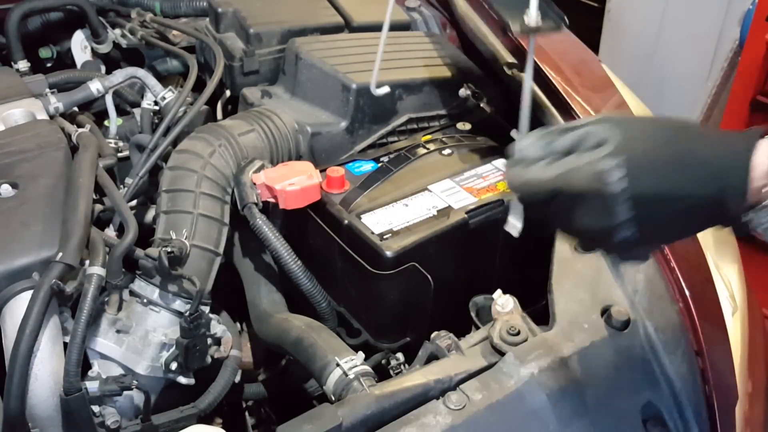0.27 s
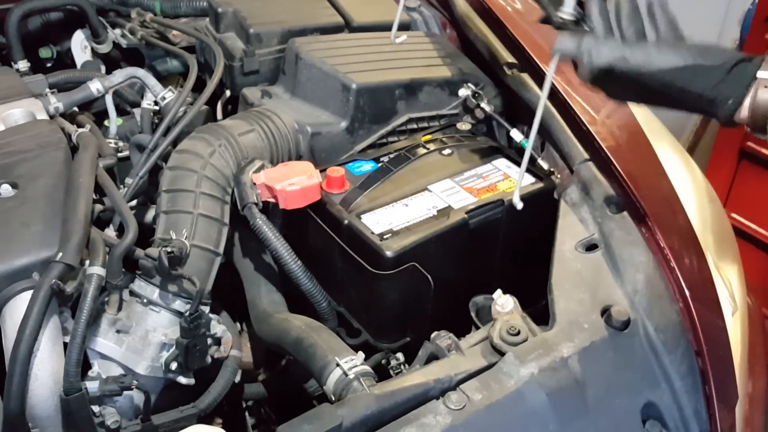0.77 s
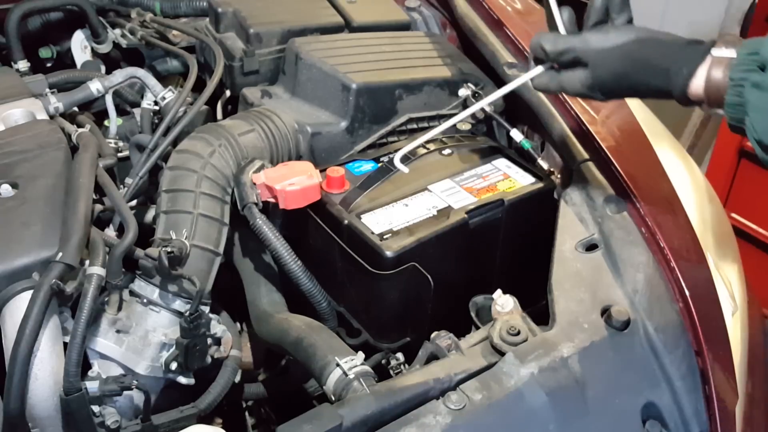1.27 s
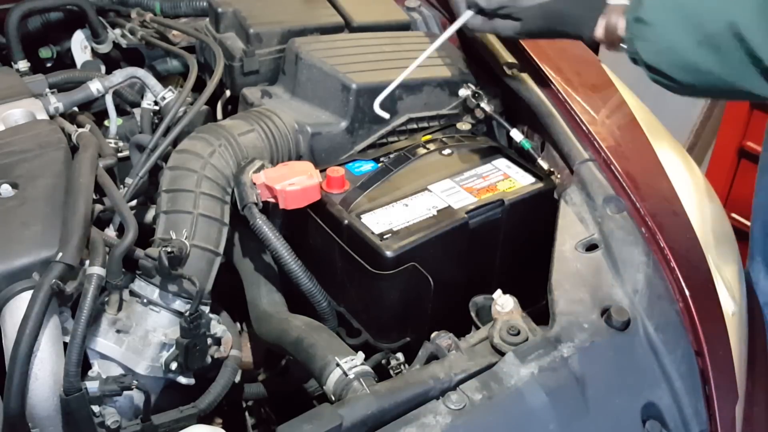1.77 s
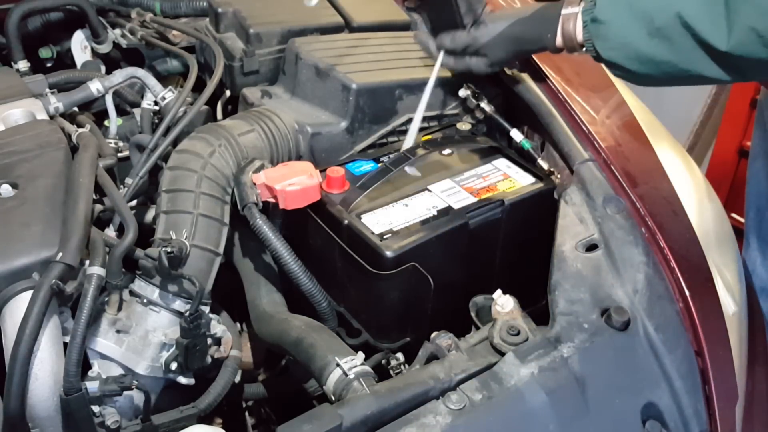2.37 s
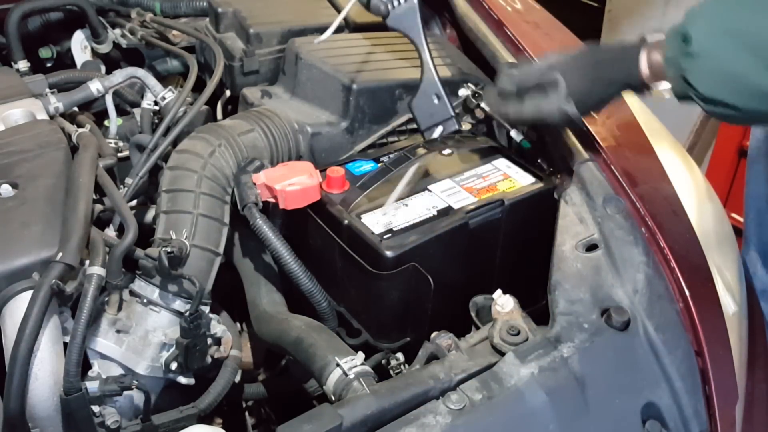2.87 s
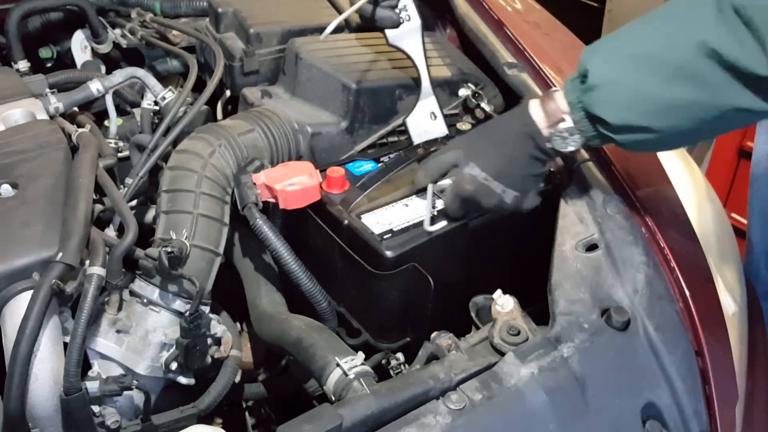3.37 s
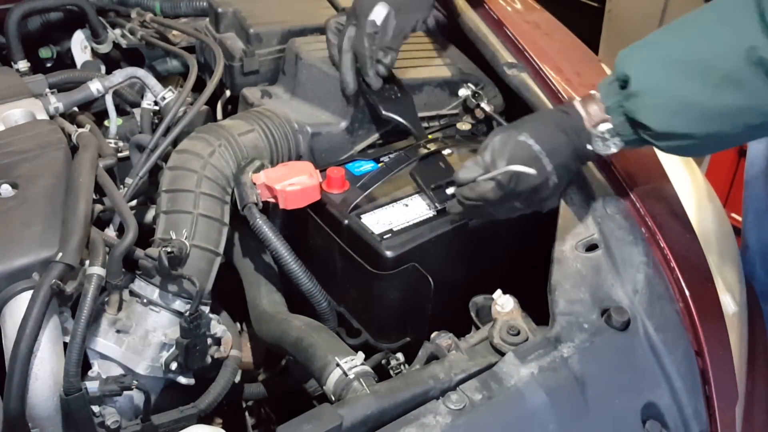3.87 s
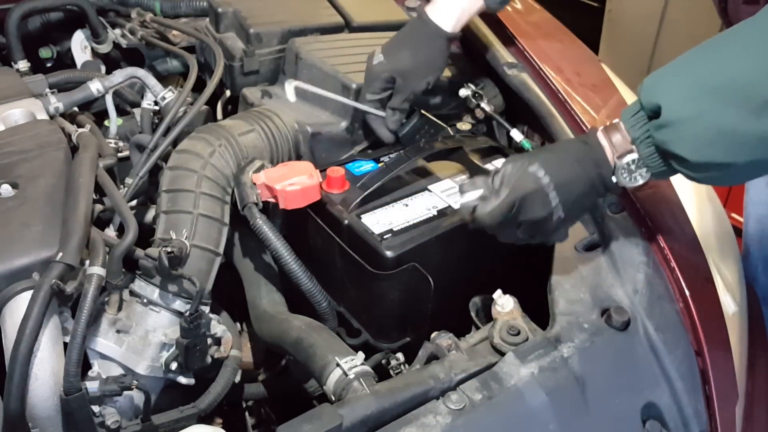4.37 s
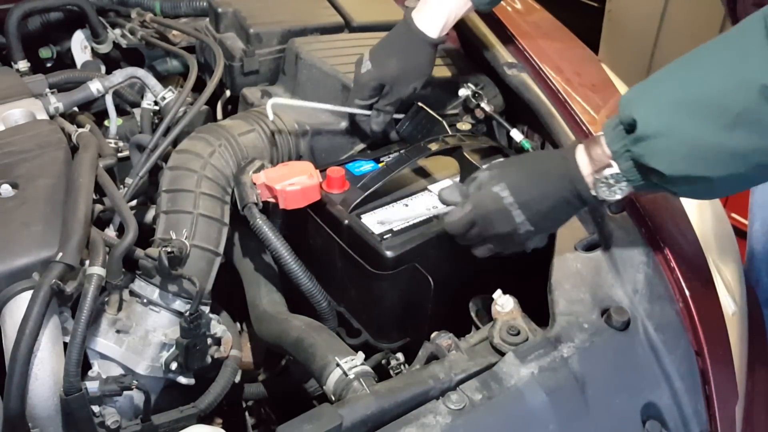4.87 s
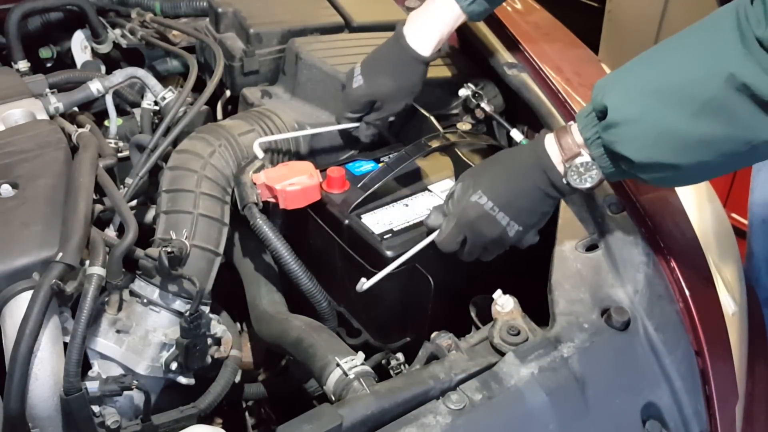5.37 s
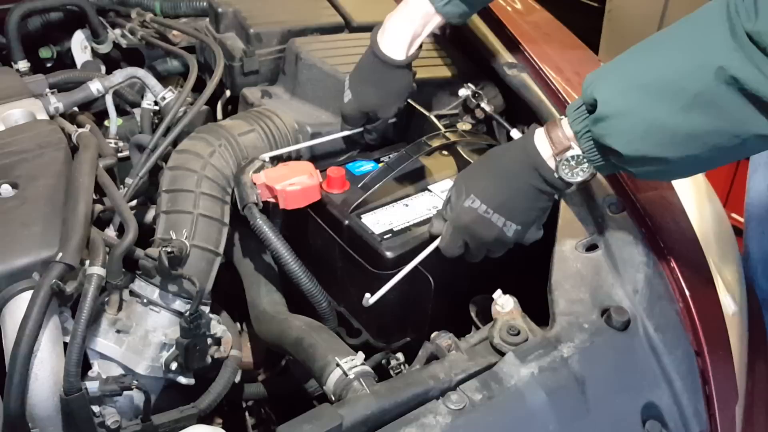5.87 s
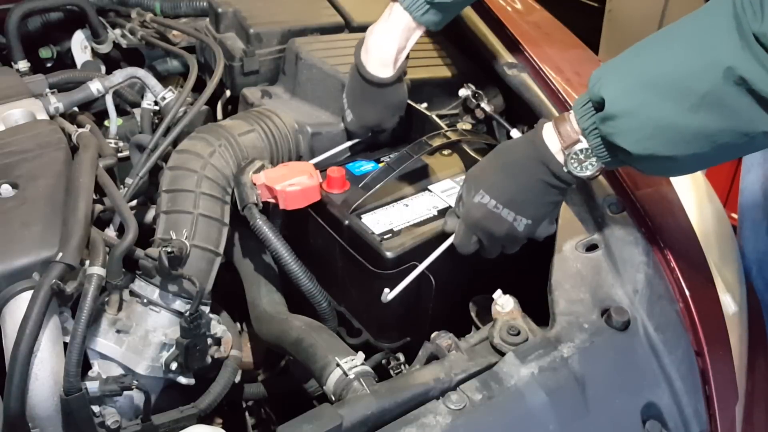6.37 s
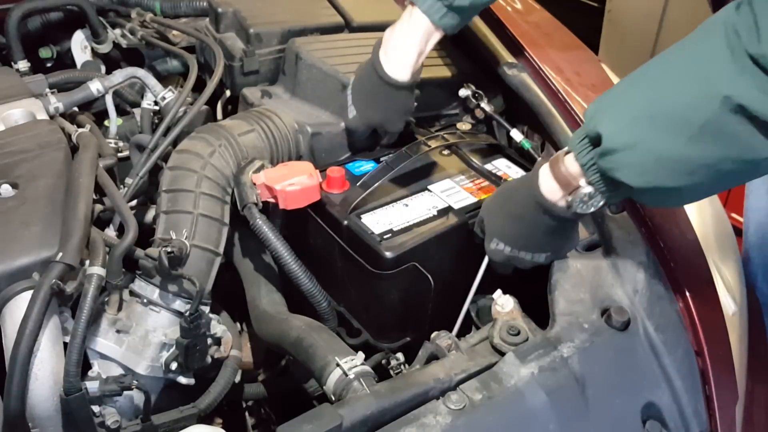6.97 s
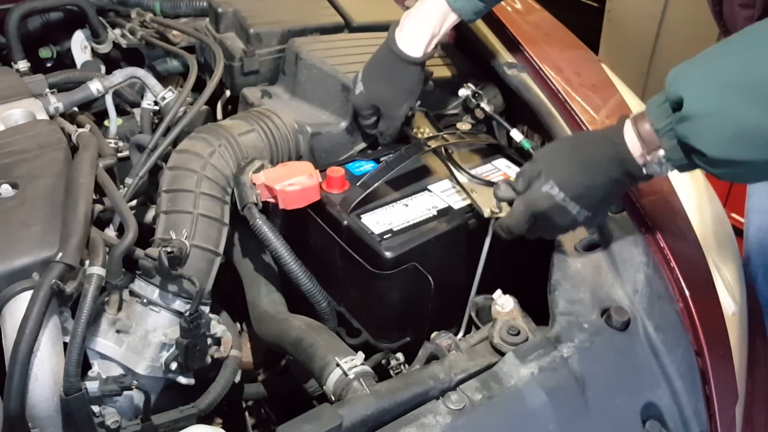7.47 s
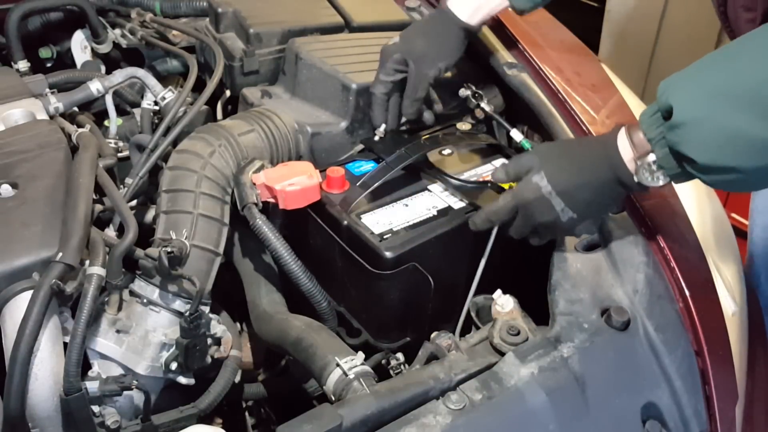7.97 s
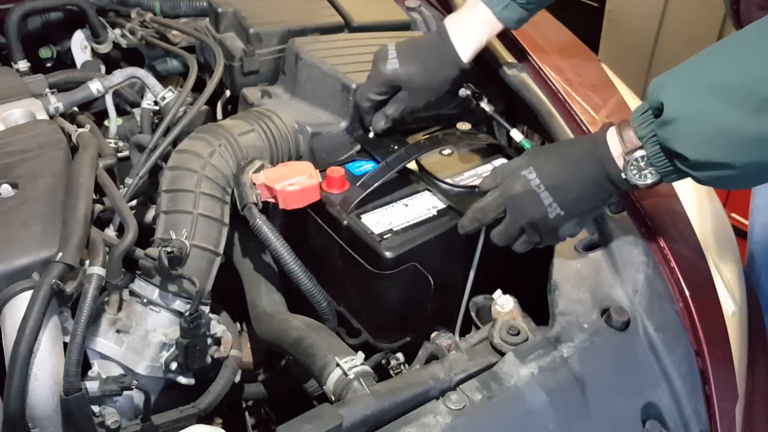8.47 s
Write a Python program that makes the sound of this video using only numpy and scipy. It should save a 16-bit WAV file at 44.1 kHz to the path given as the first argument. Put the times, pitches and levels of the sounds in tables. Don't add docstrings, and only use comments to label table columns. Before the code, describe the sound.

Close phone pickup in a car engine bay, with a brief garage echo. Throughout, low machinery rumble, quiet hiss and a deep motor hum swelling about twice a second. At 0.1 s a loud bright steel clink, with glove rustle; around 0.7 s a tiny rubbery squeak rises and falls. Sparse ticks follow, then a sharp knock at 2.1 s and lighter ones near 2.5. From 3.2 s taps and a low scrape lead to a strong hollow plastic clack at 3.9 and a rattling one at 4.2. A calmer gap, then from 5.1 s small probing taps, a hard knock at 5.9 and a rattle at 6.05. Loud gritty scrapes at 6.5-6.7 s run into dense hard knocks with short steel rings from 6.8 to 7.6, a low thump at 7.57, another clinking knock at 7.9, then soft taps and rustle until about 8.7.

```python
import sys
import numpy as np
from scipy import signal
from scipy.fft import rfft, irfft, next_fast_len
from scipy.io import wavfile
from scipy.ndimage import uniform_filter1d

SR = 44100
rng = np.random.default_rng(int(sys.argv[2]) if len(sys.argv) > 2 else 0)


def persist_wave(psi):
    counts = np.round(np.clip(psi, -1, 1) * 32767).astype(np.int16)
    wavfile.write(sys.argv[1], SR, np.atleast_2d(counts).T)


def ratio_of_db(decibels):
    return 10 ** (np.asarray(decibels, float) / 20)


N = 385431
TIME_S = np.arange(N) / SR
PORT_LAG_S = 9e-5
LEFT_RIGHT_DB = np.array([[1.0], [-1.0]])


def unit(x):
    return x / np.sqrt(np.mean(x ** 2))


def curve(table):
    s, *columns = np.transpose(table)
    return [np.interp(TIME_S, s, c) for c in columns]


def at(points, hz):
    f, v = np.transpose(points)
    return np.interp(np.log(np.maximum(hz, 1)), np.log(np.maximum(f, 1)), v, left=v[0])


def colour(x, gain):
    size = next_fast_len(x.shape[-1])
    hz = np.arange(size // 2 + 1) * SR / size
    return irfft(rfft(x, size) * gain(hz), size)[..., :x.shape[-1]]


def walk(rate):
    k = int(SR / rate)
    steps = np.repeat(rng.standard_normal(N // k + 1), k)
    return 1.96 * uniform_filter1d(uniform_filter1d(steps, k), k)[:N]


def ring(hz, gain, t60, turn, length):
    t = np.arange(int(length * SR)) / SR
    modes = np.exp(np.outer(2j * np.pi * hz - np.log(1000) / t60, t))
    ports = np.array([gain * np.exp(.5j * turn), gain * np.exp(-.5j * turn)])
    return np.imag(ports @ modes)


def rise(x, s):
    return x * (1 - np.exp(-np.arange(x.shape[1]) / SR / s))


def add(out, s, x):
    i = int(s * SR)
    out[:, i:i + x.shape[1]] += x[:, :N - i]


def grains(rate, spread_db):
    happens = rng.random(N) < rate / SR
    size = ratio_of_db(spread_db * np.minimum(rng.exponential(size=N), 4))
    clicks = happens * size * rng.standard_normal(N)
    return np.array([clicks, np.roll(clicks, 3)])


# pitch_hz, level_db (per Hz)
RUMBLE_TONE = [(12, -22), (20, -17), (75, 1), (238, -5), (280, -10), (416, -10.5), (517, -22), (630, -15.5),
               (1060, -23.5), (1500, -37), (1950, -58), (3300, -120)]
# pitch_hz, likeness (0-1)
RUMBLE_LIKENESS = [(25, 0.57), (130, 1), (290, 0.84), (640, 0.6), (1400, 0)]
# pitch_hz, level_db (per Hz)
HISS_TONE = [(880, -22), (1500, -0.5), (1940, -5.5), (2830, -7), (3220, -7), (5880, -23), (7390, -5),
             (9750, -19.5), (16000, -15.5)]
# time_s, level_db
MOTOR_LOAD = [(0.0, 0.5), (1.0, -3), (2.0, -2), (3.0, -2), (4.0, -0.5), (4.7, -2), (5.8, 1), (6.6, 1),
              (7.4, -1), (8.2, -2), (8.74, 0.5)]
RUMBLE_DB, HISS_DB, HUM_DB, SECOND_MOTOR_DB = -52, -65, -55, -3
HUM_HZ, BEAT_HZ, BEAT_NULL_S = 58, 2.288, 4.39


def rumble(load_db):
    def shared(f):
        return np.clip(at(RUMBLE_LIKENESS, f), 0, 1)

    mid, side = rng.standard_normal((2, N))
    mid = colour(mid, lambda f: ratio_of_db(at(RUMBLE_TONE, f)) * np.sqrt(1 + shared(f)))
    side = colour(side, lambda f: ratio_of_db(at(RUMBLE_TONE, f)) * np.sqrt(1 - shared(f)))
    level_db = RUMBLE_DB + 2.2 + load_db + 1.1 * walk(2.62)
    return np.array([mid + side, mid - side]) / np.std(mid) * ratio_of_db(level_db)


def room_hiss():
    air = colour(rng.standard_normal((2, N)), lambda f: ratio_of_db(at(HISS_TONE, f)) * (f > 900))
    return unit(air) * ratio_of_db(HISS_DB + 2 + walk(4.04))


def hum(load_db):
    phase = 2 * np.pi * np.cumsum(HUM_HZ * (1 + 0.00787 * walk(3))) / SR
    phase = phase + np.array([[-.25], [.25]])
    slip = np.pi * BEAT_HZ * (TIME_S - BEAT_NULL_S)
    motors = np.sin(phase + slip) - ratio_of_db(SECOND_MOTOR_DB) * np.sin(phase - slip)
    return np.sqrt(2) * ratio_of_db(HUM_DB + 0.68 * load_db + 0.69 * walk(1.52)) * motors


def garage():
    load_db = curve(MOTOR_LOAD)[0]
    return rumble(load_db) + room_hiss() + hum(load_db)


# pitch_hz, width_hz, level_db
CASE_RING = [(620, 89, 3.5), (899, 98, 2.5), (1225, 115, -2.5), (1600, 200, -6), (2280, 50, -16),
             (2730, 40, -13), (3100, 6.5, -30)]


def case(f):
    answer = sum(ratio_of_db(db) / (1 + 1j * (f - hz) / width) for hz, width, db in CASE_RING)
    return answer * f ** 2 / (f ** 2 + 330 ** 2)


# pitch_hz, level_db (per Hz)
CRACK_TONE = [(1060, -46), (1800, -7), (3380, -9.5), (4330, -14), (5290, -14.5), (6840, -17.5),
              (8210, -13.5), (9330, -29.5), (12700, -35.5), (16000, -41)]
# start_s, push_s, scrape_db, steel_grit_db
DRAGS = [
    (3.625, 0.125, -41, -52),
    (6.535, .045, -38, -44),
    (7.43, .06, -45.5, -58),
    (7.715, 0.057, -45, -56),
    (7.83, 0.065, -46, -68),
    (6.655, .055, -35, -41),
    (6.59, .105, -44, -60),
    (3.685, .03, -42, -60),
    (6.54, .04, -44, -60),
    (3.845, .03, -52, -60),
]
# pitch_hz, width_hz, plain_scrape_db (under the song)
DRAG_SONG = [(885, 70, -24), (620, 300, -12), (1310, 420, -12), (900, 700, -12), (820, 1200, -12),
             (620, 200, -10), (2400, 500, -30), (680, 80, -24), (2200, 700, -30), (1700, 800, -24)]
BITE_S, GROWTH_DB, RELEASE_DB_PER_S = .01, 6, 210


def drag_rods(slips):
    song, grit = np.zeros((2, 2, N))
    judder = ratio_of_db(2.3 * walk(110))
    for (s, push, sing_db, grit_db), (hz, width, plain_db) in zip(DRAGS, DRAG_SONG):
        span = slice(int(s * SR), int((s + 0.44) * SR))
        x = TIME_S[span] - s
        force_db = np.minimum(GROWTH_DB * (x / push - 1), RELEASE_DB_PER_S * (push - x))
        press = judder[span] * np.clip(x / BITE_S, 0, 1) * ratio_of_db(force_db)

        def spot(f):
            return case(f) * (ratio_of_db(plain_db) + 1 / (1 + ((f - hz) / (width / 2)) ** 2))

        song[:, span] += press * ratio_of_db(sing_db) * unit(colour(slips[:, span], spot))
        grind = colour(slips[:, span], lambda f: ratio_of_db(at(CRACK_TONE, f)))
        grit[:, span] += press * ratio_of_db(grit_db) * unit(grind)
    return song, grit


# pitch_hz, level_db (per Hz)
CLOTH_TONE = [(710, -17), (1200, -15), (1510, -4.5), (1750, -23), (1950, -6), (3250, -8.5), (7910, -7.5),
              (9310, -17.5), (15200, -16), (16000, -24)]
# middle_s, half_length_s, scrape_db (on the case), rustle_db (cloth)
MOVES = [(0.192, 0.21, -59, -51), (0.64, 0.035, -57, -52), (0.72, .03, -60, -62), (0.79, 0.06, -57, -52),
         (1.78, 0.11, -58, -55), (2.028, .12, -62, -57.5), (2.816, 0.095, -54.5, -53),
         (3.44, 0.065, -55, -53.5), (3.604, 0.034, -49.5, -60), (3.88, 0.057, -52, -52),
         (3.968, 0.078, -47, -68), (4.254, 0.085, -55, -61), (2.427, 0.053, -77, -63.5),
         (4.888, 0.025, -64, -54.5), (5.082, 0.6, -69, -69), (5.463, 0.052, -68, -84),
         (5.92, 0.081, -50, -68), (6.208, 0.096, -53.5, -59.5), (6.42, 0.042, -55, -58),
         (6.859, 0.048, -53.5, -63), (7.075, 0.096, -44, -59), (7.25, 0.12, -60, -68),
         (7.4, 0.052, -53.5, -52), (7.61, 0.069, -47, -66), (7.967, 0.049, -42.5, -64),
         (8.54, 0.042, -56, -72), (8.68, 0.079, -52.5, -52.5)]
IDLE_DB = np.array([[-66], [-66.5]])


def rub():
    slips = grains(800, 2.65) + .5 * rng.standard_normal((2, N))
    threads = 0.46 * grains(1400, 1.8) + rng.standard_normal((2, N))
    power = ratio_of_db(2 * IDLE_DB)
    for s, half, scrape_db, rustle_db in MOVES:
        power = power + np.exp(-((TIME_S - s) / half) ** 2) * ratio_of_db(2 * np.array([[scrape_db], [rustle_db]]))
    force = np.sqrt(power)
    song, grit = drag_rods(slips)
    scrape = unit(colour(slips, case)) * force[0] + song
    rustle = unit(colour(threads, lambda f: ratio_of_db(at(CLOTH_TONE, f)))) * force[1] + grit
    scrape = scrape * ratio_of_db(2.43 * walk(35) + np.array([[2.2], [-.6]]))
    return scrape + rustle * ratio_of_db(2 * walk(30) + 0.5)


# pitch_hz, level_db, t60_s (time to fall 60 dB), family (0-3, low to top)
STEEL_RING = [(1332, -15, .2, 0), (2355, -9, .1, 0), (2912, -9, .1, 0), (3135, -4, .07, 0), (3716, -5, .1, 0),
              (4085, -4, .14, 0), (4340, -8, .15, 0), (4980, -14, .1, 0), (5865, -2, .15, 0),
              (7075, -16, .22, 1), (7260, -19, .15, 1), (7950, 0, .2, 1), (8730, -22, .08, 1), (9690, -1, .13, 2),
        (10465, -4, .2, 2), (11710, -9, .06, 2), (12460, -10, .1, 3), (12690, -5, .12, 3),
        (13628, -4, .17, 3), (15080, -18, .06, 3)]
# low_db (1.3-6
# kHz), high_db (9.7-12 kHz), top_db (12-15 kHz)
LOOSE = [
    (0.1015, -46, -13, -10, -12),
    (0.122, -29.5, -7, -8, -11),
    (6.0428, -48, 0, -7, 1),
    (7.002, -45.5, 5, -20, 4.5),
    (7.1721, -53, -12, -12, -1),
    (7.9254, -36.5, -6, -16, -17),
]
# start_s, level_db, low_db, high_db, top_db
GRIPPED = [(0.171, -30.5, -3, -9, -10), (1.1553, -52.5, -3.5, 2, -1), (2.6544, -51, -10, -18, -14),
           (3.914, -60, 8, -16, -14), (6.6726, -44.5, -12, -11, -16), (6.6937, -46, -20, -19, -13),
           (6.7074, -50, -9, -4, -9), (6.822, -62, -6, 8, 8), (6.9686, -43, -20, -9, -12),
           (7.0555, -50, 9, -36, -14), (7.9092, -43.5, 2, -14, -13), (8.002, -55, -1, -4, -19.5)]
LOOSE_SHARE, GRIPPED_SHARE = 1, 0.61


def clinks():
    out, steel = np.zeros((2, N)), STEEL_RING
    hz, db, t60, family = np.transpose(steel)
    family = np.round(family).astype(int)
    rows = [(*r, LOOSE_SHARE) for r in LOOSE] + [(*r, GRIPPED_SHARE) for r in GRIPPED]
    for s, level_db, low_db, high_db, top_db, grip in rows:
        chance = rng.standard_normal((2, len(steel)))
        family_db = np.array([low_db, 0, high_db, top_db + 5.5])[family]
        gain = ratio_of_db(level_db + db + family_db + 2.5 * chance[0])
        tone = ring(hz, gain, t60 * np.clip(grip, .1, 2), 1.33 + 0.5 * chance[1], .25)
        add(out, s, rise(tone, 0.00054))
    shake_db = 2.6 * np.array([walk(120), walk(120)])
    return out * ratio_of_db(shake_db + LEFT_RIGHT_DB + 3.0)


CASE_T60_S = 0.07
MAIN_RING_DB, MAIN_MODE_DB = 4.5, -8
SOFT_DB_PER_OCTAVE = 0.03
CASE_TONES = 60


def case_body(hz, crack_db, chance):
    shift, sign, turn = chance
    f = np.geomspace(240, 4200, CASE_TONES) * (1 + 0.023 * shift)
    octaves = np.log2(f / hz)
    treble_slope = -2.5 + SOFT_DB_PER_OCTAVE * min(crack_db, 0)
    gain = ratio_of_db(np.where(octaves < 0, 9.25 * octaves, treble_slope * octaves))
    gain *= np.sign(sign) * (0.71 + .5 * abs(sign))
    gain /= 1 + (420 / f) ** 4
    gain *= ratio_of_db(MAIN_RING_DB * np.exp(-(octaves / .14) ** 2))
    turn = 2 * np.pi * f * PORT_LAG_S + .5 * turn * np.minimum(f / 900, 1.5)
    return rise(ring(f, gain, CASE_T60_S * (800 / f) ** 0.94, turn, .07), .0002)


def struck_spot(hz, chatter):
    t60 = .7 * CASE_T60_S * (800 / hz) ** .6 * np.ones(3)
    turn = 2 * np.pi * hz * PORT_LAG_S * np.ones(3)
    tone = ring(hz * np.array([.97, 1, 1.04]), np.array([.35, 1, .45]) / 1.4, t60, turn, .12)
    return rise(tone, chatter / 6)


def contact(t, chatter):
    x = t / max(chatter, .002)
    swell = np.clip(4 * x * (1 - x) + 0.95, 0, 1) * (x < 1) * min(chatter / .03, 1)
    bounces = (rng.random(len(t)) < 1500 / SR) * rng.standard_normal(len(t)) * swell
    bounces[0] = 1.44 * np.exp(-chatter / 0.041)
    return bounces


def contact_crack(t, bounces, noise):
    fade = np.exp(-t / 0.001) + 0.11 * np.exp(-t / 0.025)
    burst = np.sqrt(abs(signal.fftconvolve(fade ** 2, bounces ** 2)))
    return colour(noise, lambda f: ratio_of_db(at(CRACK_TONE, f))) * burst


# start_s, peak_db, main_ring_hz, crack_db
SINGLE_KNOCKS = [(0.114, -31, 1430, 4), (0.122, -26.5, 1280, 9), (0.171, -27, 2530, 8), (0.615, -43, 506, 6),
                 (0.651, -32, 730, -14), (1.153, -54, 385, 10.5), (1.383, -37, 1690, -2.5),
                 (2.069, -18.5, 850, -3), (2.225, -55, 400, 5), (2.491, -33, 2920, 1), (2.596, -27.5, 940, -9),
                 (3.18, -28, 1510, -16), (3.355, -63, 3000, 12), (3.377, -26.5, 660, -12),
                 (3.588, -22.5, 1070, -4.5), (3.671, -33, 1600, -1), (3.699, -32, 680, -14),
                 (3.915, -13, 740, -15.5), (4.067, -23, 890, -9), (4.154, -40, 840, -17), (4.402, -33.5, 810, -5),
                 (4.42, -30.5, 945, -2),
                 (5.057, -58.5, 2200, 11), (5.094, -35.5, 899, -16), (5.157, -41, 2120, -2),
           (5.193, -29, 1140, -11.5), (5.317, -42.5, 332, -8), (5.453, -37.5, 760, -35),
           (5.567, -39.5, 603, -12), (5.593, -41, 593, -8), (5.642, -45, 3100, 10.5),
           (5.681, -27.5, 1100, -12), (5.736, -23, 620, -41), (5.762, -50.5, 3800, 16.5),
           (5.798, -31, 714, -31), (5.872, -12.5, 670, -17.5), (5.936, -33, 2730, -10),
           (5.969, -34.5, 665, -22), (6.197, -30.5, 834, -16), (6.324, -56, 587, -10),
           (6.406, -36, 439, -5), (6.447, -31, 1020, -13.5), (6.582, -28.5, 616, -20),
           (6.672, -31, 614, -3.5), (6.707, -20, 570, -22), (6.817, -15, 786, -19.5),
                 (6.969, -23.5, 553, -4.5), (7.001, -11, 1370, -21), (7.018, -18, 1540, -0.5),
            (7.054, -20, 1380, -6.5), (7.169, -16.5, 1320, -25), (7.224, -20, 890, -11),
            (7.252, -26.5, 940, -12), (7.327, -13.5, 1600, -8), (7.368, -17, 1650, -15.5),
            (7.383, -22, 1520, -16), (7.449, -30.5, 1320, -21), (7.572, -10.5, 1500, -14.5),
            (7.644, -22.5, 583, -15), (7.749, -33.5, 929, -1), (7.771, -33.5, 530, -2.5),
            (7.911, -15, 1090, -7.5), (8.004, -25.5, 687, -2), (8.463, -33, 900, -18),
            (8.473, -51, 3500, 12), (8.564, -42, 730, -8), (8.621, -31, 930, -2), (8.682, -25, 990, -9)]
# start_s, peak_db, main_ring_hz, crack_db, chatter_s (length of contact)
RATTLES = [(0.819, -47, 990, 6, 0.026), (1.398, -49.5, 393, 10.5, 0.035), (2.628, -36, 1090, -6.5, 0.03),
           (3.015, -32.5, 353, -15, 0.011), (3.943, -28.5, 740, -15.5, 0.042),
           (4.187, -29, 1020, -26, 0.013), (4.196, -15.5, 740, -14.5, 0.035), (5.84, -25, 570, -7.5, 0.047),
           (6.042, -16, 955, -16, 0.034), (6.139, -23.5, 660, -18, 0.019), (6.963, -25.5, 674, -2.5, 0.016),
           (7.191, -41, 610, 0, 0.054), (7.924, -19, 840, -28, 0.024), (8.019, -28, 676, -22, 0.016)]
KNOCK_CHATTER_S = 0.0085


def knocks():
    out = np.zeros((2, N))
    t = np.arange(int(.12 * SR)) / SR
    singles = [(*r, KNOCK_CHATTER_S) for r in SINGLE_KNOCKS]
    rows = [*singles, *RATTLES]
    chances = rng.standard_normal((len(rows), 3, CASE_TONES))
    for (s, db, hz, crack_db, chatter), chance in zip(rows, chances):
        noise = np.array([[1, 0.74], [1, -0.35]]) @ rng.standard_normal((2, 2 * len(t) - 1))
        bounces = contact(t, chatter)
        body = signal.fftconvolve(case_body(hz, crack_db, chance), bounces[None], axes=1)
        crack = contact_crack(t, bounces, noise)[:, :body.shape[1]]
        hit = body / abs(body.mean(0)).max()
        hit += ratio_of_db(crack_db + 3.5) * crack / abs(crack.mean(0)).max()
        hit[:, :len(t)] += ratio_of_db(MAIN_MODE_DB - max(crack_db, 0)) * struck_spot(hz, chatter)
        add(out, s, hit * ratio_of_db(db - .7 + LEFT_RIGHT_DB))
    return out


# start_s, peak_db (before
# TING_DB), pitch_hz, t60_s
TINGS = [(0.3386, -42, 3090, 0.025), (0.6195, -35, 3750, 0.025), (2.0677, -21, 3170, 0.025),
         (2.4917, -28, 3070, 0.025), (3.3752, -36, 2880, 0.025), (3.5867, -24, 2730, 0.025),
         (4.4228, -33, 2410, 0.025), (5.6436, -31, 5170, 0.025), (5.7633, -36, 5070, 0.025),
         (5.9369, -31, 2740, 0.025), (6.5574, -36, 2300, 0.025), (6.5714, -35, 2320, 0.025),
         (6.6443, -33, 2380, 0.025), (6.6644, -33, 2370, 0.025), (6.6932, -29, 2440, 0.025),
         (6.7805, -48, 2650, 0.025), (7.0174, -17, 3160, 0.025), (7.223, -23, 2300, 0.025),
         (7.3262, -14, 2830, 0.025), (7.3682, -20, 3280, 0.025), (7.3824, -25, 2300, 0.025),
         (7.5712, -21, 2300, 0.025), (8.6802, -36, 2540, 0.025)]
# start_s, peak_db, pitch_hz,
# t60_s
LINGERS = [(0.178, -39, 1370, .32), (0.124, -35, 870, .09), (0.122, -26, 3800, .03),
           (3.597, -38, 3750, .08), (3.673, -35, 1590, .07), (2.072, -31, 600, .12),
           (2.072, -31, 1050, .05), (5.936, -39, 5800, .04), (7.333, -33, 600, .1), (6.71, -40, 4700, .03),
           (3.228, -50, 950, .05), (3.443, -47, 880, .05), (3.513, -44, 880, .05), (5.842, -31, 610, .1),
           (3.018, -40, 950, .05), (2.63, -40, 1300, .05), (3.6, -36, 420, .06), (0.174, -38, 4150, .12),
           (7.928, -42, 5865, .16), (2.492, -42, 1550, .04), (5.737, -30, 620, .05)]
TING_DB = -6


def tings():
    out = np.zeros((2, N))
    short = [(s, db + TING_DB, hz, t60) for s, db, hz, t60 in TINGS]
    for s, db, hz, t60 in [*short, *LINGERS]:
        t60 = np.clip(t60, .008, .5) * np.array([1, .6])
        turn = 2 * np.pi * hz * PORT_LAG_S * np.array([1, .5])
        pair = ring(hz * np.array([1, 1.045]), ratio_of_db(db) * np.array([1, .4]), t60, turn, .25)
        add(out, s, rise(pair, .0004) * ratio_of_db(LEFT_RIGHT_DB))
    return out


# time_s, pitch_hz, level_db
SQUEAK = [
    (0.675, 190, -52),
    (0.71, 340, -44),
    (0.728, 500, -50),
    (0.74, 640, -45),
    (0.755, 730, -52),
    (0.775, 690, -53),
    (0.80, 450, -54),
]


def squeak():
    hz, db = curve(SQUEAK)
    gate = np.clip(np.minimum(TIME_S - SQUEAK[0][0], SQUEAK[-1][0] - TIME_S) / 0.0079, 0, 1)
    level = gate * ratio_of_db(db - 6.5 + 1.8 * walk(69.7))
    return np.sqrt(2) * level * np.sin(2 * np.pi * np.cumsum(hz * (1 + .02 * walk(148))) / SR)


# start_s, peak_db, pitch_hz
THUMPS = [
    (3.917, -33, 154),
    (4.205, -38, 330),
    (5.875, -35, 290),
    (6.708, -40, 290),
    (6.051, -27.5, 383),
    (7.338, -44, 260),
    (7.574, -28.5, 348),
    (7.92, -39.5, 390),
]


def thumps():
    out = np.zeros((2, N))
    for s, db, hz in THUMPS:
        gain = ratio_of_db(db + 2.5) * np.array([1, .5])
        boom = ring(hz * np.array([1, 1.23]), gain, np.array([.12, .08]), np.zeros(2), .2)
        add(out, s, rise(boom, .003))
    return out


ROOM_T60_S, ROOM_DB, BAY_T60_S, BAY_DB = 0.17, -17, 0.069, -10
SHARED_BELOW_HZ = 500


def echoes(x):
    t = np.arange(int(.5 * SR)) / SR
    bay = rng.standard_normal((2, len(t))) * ratio_of_db(-60 * t / BAY_T60_S) * (t > .001)
    room = colour(rng.standard_normal((2, len(t))), lambda f: 1 / (1 + f / 2500))
    room = room * ratio_of_db(-60 * t / ROOM_T60_S) * (t > .012)
    tail = ratio_of_db(BAY_DB) * bay / np.linalg.norm(bay[0]) + ratio_of_db(ROOM_DB) * room / np.linalg.norm(room[0])
    shared = tail.mean(0)
    tail = shared + colour(tail - shared, lambda f: f ** 2 / (f ** 2 + SHARED_BELOW_HZ ** 2))
    return signal.fftconvolve(x.mean(0)[None], tail, axes=1)[:, :N] * ratio_of_db(1.2 * LEFT_RIGHT_DB)


def scene():
    work = knocks() + thumps() + tings() + clinks() + rub() + squeak()
    return work + echoes(work) + garage()


def top_cut(x):
    return signal.sosfilt(signal.butter(12, 16870, fs=SR, output="sos"), x)


def record(dry):
    low_pass = signal.ellip(8, .2, 70, 16200, fs=SR, output="sos")
    mix = signal.sosfilt(low_pass, dry) - 0.00093
    return top_cut(mix)


dry = scene()
out = record(dry)
persist_wave(out)
```